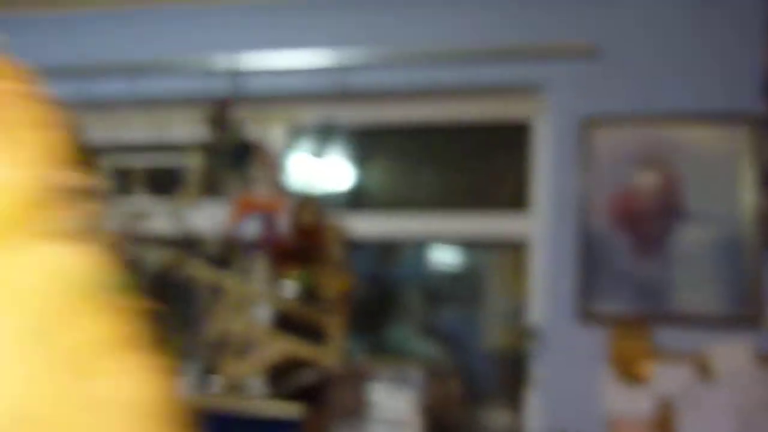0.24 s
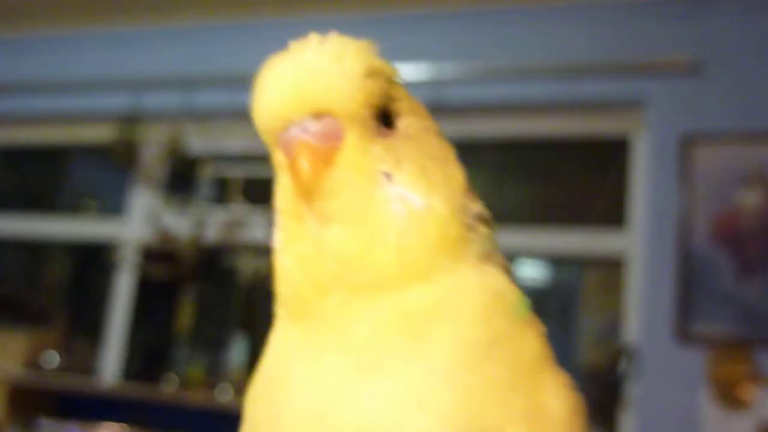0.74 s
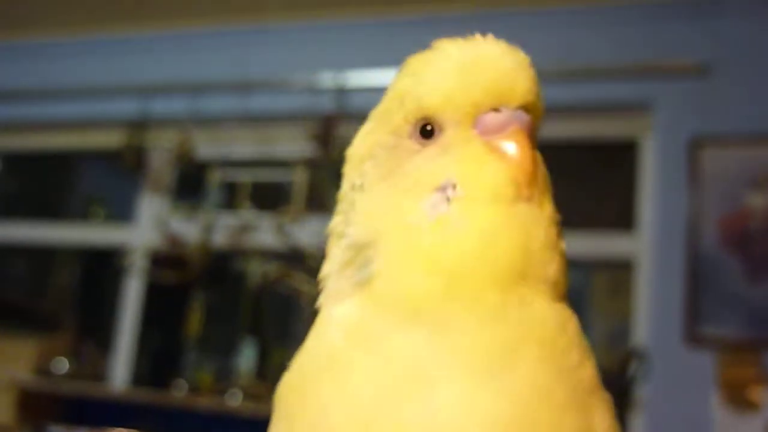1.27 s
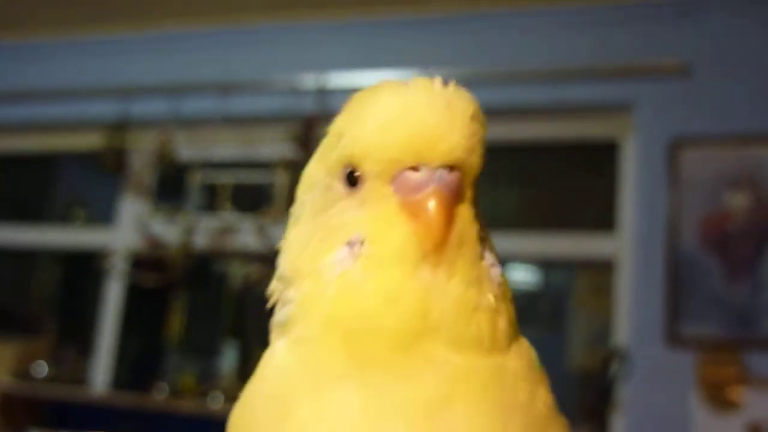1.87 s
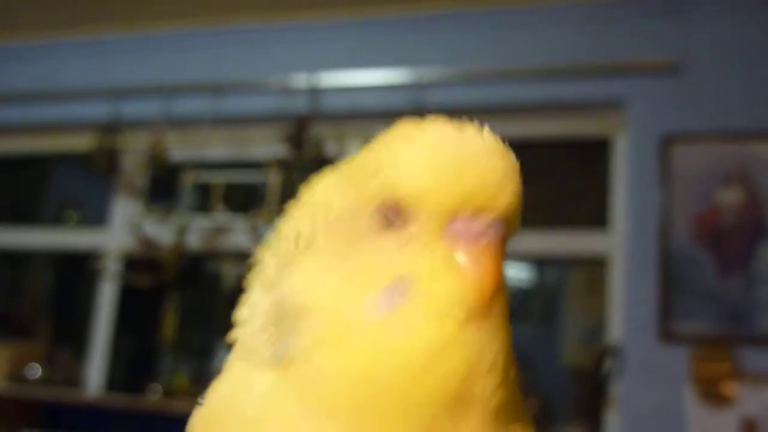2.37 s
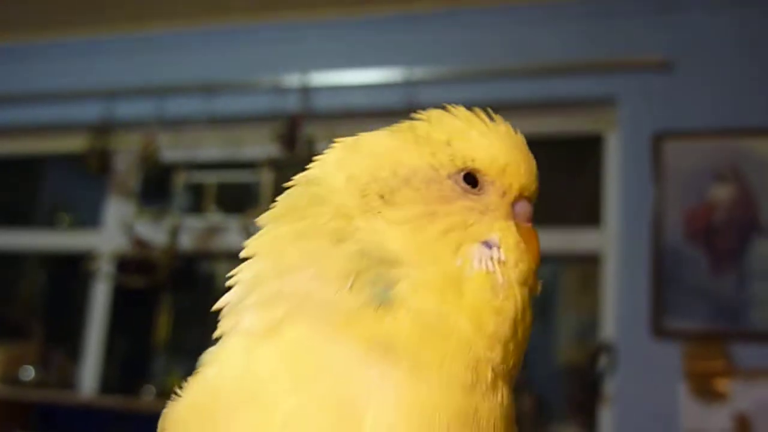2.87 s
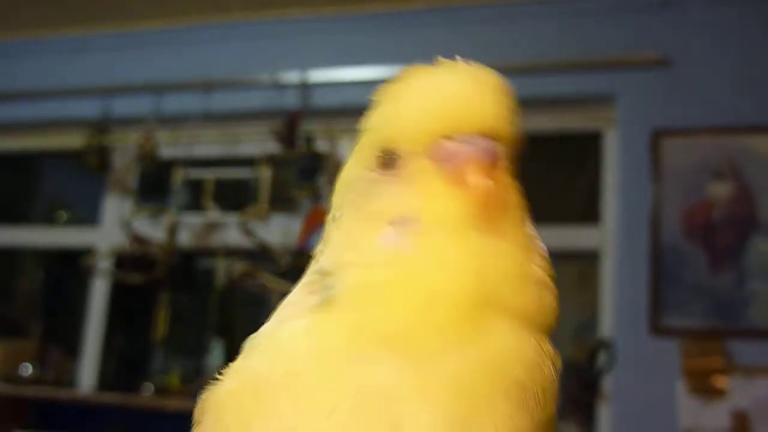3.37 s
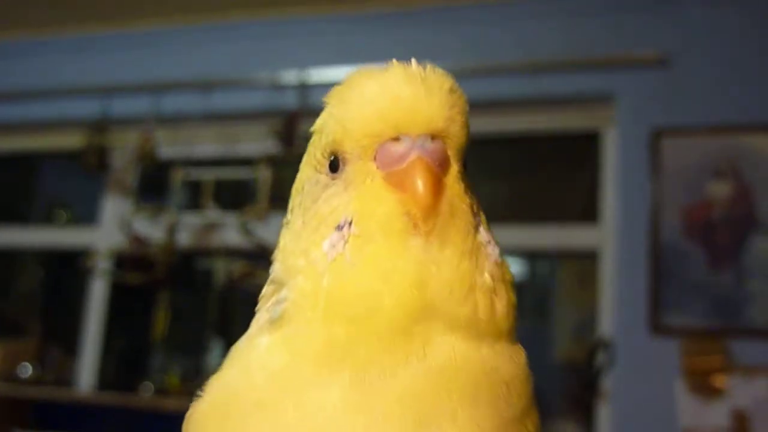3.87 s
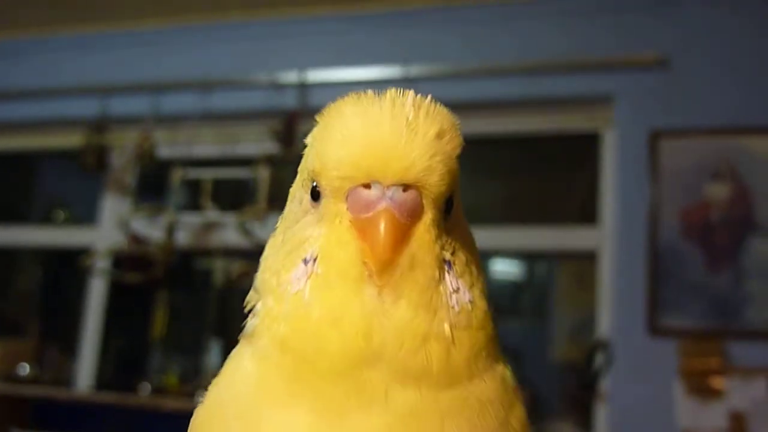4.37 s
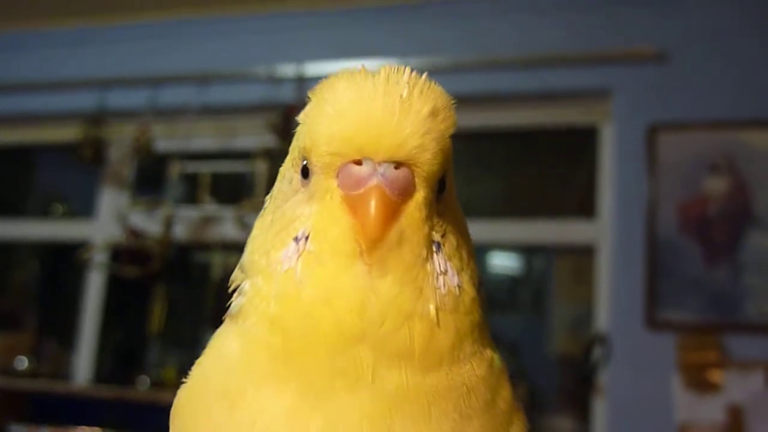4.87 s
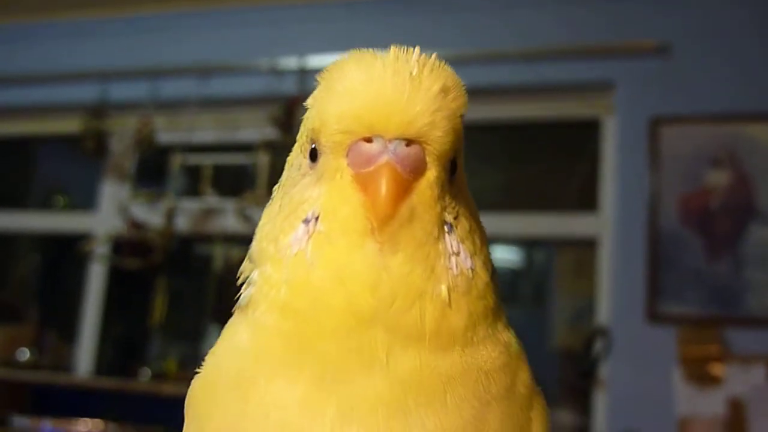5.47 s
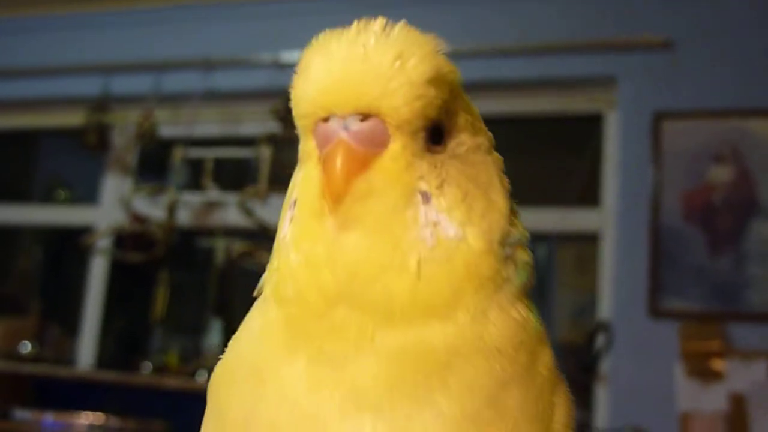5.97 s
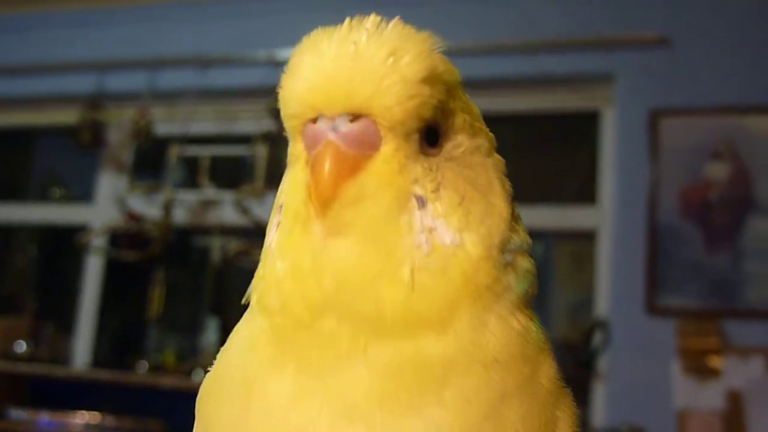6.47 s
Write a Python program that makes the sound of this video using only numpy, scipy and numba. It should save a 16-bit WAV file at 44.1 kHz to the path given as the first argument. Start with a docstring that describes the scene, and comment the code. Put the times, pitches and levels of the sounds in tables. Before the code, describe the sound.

A budgie right at the microphone makes crisp, dry beak clicks. One comes early, another after a pause, then small hollow mouth pops and a short creaking rasp. After another gap, a regular run of about eleven clicks ticks along, roughly six per second, some edged with tiny squeaks. Two more clicks finish. A faint wavering low hum and soft hiss continue in a small indoor room.

```python
"""A budgie perched right in front of a small camera clicks its beak: horn meets horn a few times within
milliseconds, each contact a minimum-phase pulse. Often the edges slip and squeak (short uneven tones), the mouth
pops (decaying sines), and once the beak creaks and grinds in a short rasp (random slips ringing resonances).
Nearby surfaces and the room answer faintly (decaying noise). An appliance hums (wavering sines) in room air
and microphone hiss (shaped noise)."""
import sys
import numpy as np
from scipy import signal
from scipy.fft import rfft, irfft
from scipy.io import wavfile
from scipy.ndimage import uniform_filter1d
from numba import njit

SR = 44100
rng = np.random.default_rng(int(sys.argv[2]) if len(sys.argv) > 2 else 0)


def persist_wave(psi):
    """Save psi, clipped to +-1, as 16-bit WAV."""
    counts = np.round(np.clip(psi, -1, 1) * 32767).astype(np.int16)
    wavfile.write(sys.argv[1], SR, np.atleast_2d(counts).T)


N = 296793

# beak clicks: [t/s of the hardest catch, knock level/dB before contact gain, snap near 2.5 kHz/dB,
#   edge near 6.5 kHz/dB, catch gap before/ms, catch gap after/ms, first touch/dB re knock, pitch factor]
CLICK_ROWS = [(0.415, -52, -2, -1, 1.2, 1.2, -30, 1), (0.546, -56, 4, -11, 1.2, 1.2, -30, 1),
              (0.7055, -24.1, 1.9, 2.5, 1.01, 1.37, -28, 1.1),
              (2.1082, -25.6, -4.7, 1, .96, 1.45, -30, .85), (2.7724, -40, 0, -18, 1, 1, -30, 1),
              (2.8827, -21.7, 4.9, -13, 1.48, 1.05, -30, 1.08), (2.8903, -31, 4, -20, .9, .8, -30, 1),
              (3.8703, -26.1, -7.7, 0, 1.57, 1.42, -30, .92),
              (4.0602, -23.3, 3, -1.7, .93, 1.17, -17, 1.16),
              (4.2179, -25.6, -4.3, -14, 1.43, 1.2, -28, .94),
              (4.3777, -23.2, -4.8, -11.1, 1.09, .86, -30, .97),
              (4.5312, -22.6, 1.5, -3.9, .82, 1.07, -30, .95), (4.7021, -25.1, 4.5, 2.3, 1.3, .82, -6, .94),
              (4.8656, -25.1, 4.4, -2.5, 1.29, .92, -5, .89),
              (5.0333, -24.3, .2, -4.5, 1.11, 1.04, -15, .89),
              (5.2051, -26.1, 1.4, -6.4, .92, 1.04, -6, .93), (5.3766, -24.1, 4.7, -1, 1.27, 1.34, -3, 1),
              (5.5496, -27, 4.2, -2.7, 1.15, 1.41, 1, .95), (5.7264, -23.7, 5.3, 3.7, 1.55, 1.57, -28, .6),
              (6.4151, -27.3, -8.8, -2, 1.53, 1.35, -30, .91),
              (6.5989, -25.3, -8, -11, 1.3, 1.09, -27, 1.15)]
# hollow of the mouth behind the beak
MOUTH_HZ, MOUTH_WIDTH_HZ = 900, 220


def undb(db):
    """Decibels to gain."""
    return 10 ** (np.asarray(db) / 20)


def unit(x):
    """Scale to an rms of one."""
    return x / np.sqrt(np.mean(x ** 2))


def shape_db(points, f):
    """Read (f/Hz, level/dB) points on a log-frequency axis."""
    hz, db = np.transpose(points)
    return np.interp(np.log(f + 1), np.log(hz), db)


def colour(x, points):
    """Filter by (f/Hz, level/dB) points, zero phase."""
    gain = undb(shape_db(points, np.fft.rfftfreq(N, 1 / SR)))
    return irfft(rfft(x) * gain, N)


def follow(rows):
    """Join (t/s, value, ..) rows by straight lines, one curve per value column."""
    s, *columns = np.transpose(rows)
    t = np.arange(N) / SR
    return np.squeeze([np.interp(t, s, c) for c in columns])


def walk(rate_hz):
    """Smooth random drift with a spread near one."""
    k = int(SR / rate_hz)
    steps = np.repeat(rng.standard_normal(N // k + 1), k)
    smooth = uniform_filter1d(uniform_filter1d(steps, k), k)
    return unit(smooth)[:N]


@njit
def sweep(x, hz, width_hz):
    """State-variable bandpass whose centre moves from sample to sample, gain one at the centre."""
    y, band, low = np.empty(len(x)), 0., 0.
    for i in range(len(x)):
        g, k = np.tan(np.pi * hz[i] / SR), width_hz / hz[i]
        v = (band + g * (x[i] - low)) / (1 + g * (g + k))
        band = 2 * v - band
        low = low + 2 * g * v
        y[i] = k * v
    return y


def resonate(x, hz, width_hz):
    """One resonance, fixed or moving, with gain one at its centre."""
    return sweep(x + 1e-18, hz * np.ones(N), float(width_hz))  # offset avoids denormals


def add(out, s, sound):
    """Mix a short sound in at time s."""
    i = int(s * SR)
    out[i:i + len(sound)] += sound[:N - i]


def impulse(db):
    """Minimum-phase pulse with this spectrum, by folding the cepstrum."""
    cepstrum = irfft(np.log(undb(db)))
    half = len(cepstrum) // 2
    folded = np.r_[cepstrum[0], 2 * cepstrum[1:half], np.zeros(half)]
    return irfft(np.exp(rfft(folded)))


def appliance(fan_hz=200.6, fan_waver_db=1.0, phase_drift_rad=.2):
    """A fan tone and weaker motor lines that waver in level and phase."""
    # fan tone: [t/s, mean rms level/dB]
    fan_level = [(0.0, -53), (0.3, -48), (0.67, -52), (0.84, -47), (0.92, -53), (1.01, -48), (1.33, -52),
                 (1.74, -48), (1.8, -51), (4.33, -48), (4.35, -52), (5.27, -53), (5.38, -48), (5.42, -52),
                 (6.67, -49), (6.73, -46)]
    # motor lines: [f/Hz, mean rms level/dB, waver/dB]
    motor_lines = [(66.3, -79.5, 2), (100.3, -66.5, 2.5), (134, -73, 1.5), (273.5, -64, 2.5),
                   (372, -66.5, 1.5), (575, -76, 2.5)]
    turn = 2 * np.pi * np.arange(N) / SR
    fan_gain = undb(follow(fan_level) + fan_waver_db * walk(12))
    out = fan_gain * np.sin(fan_hz * turn + phase_drift_rad * walk(5))
    for hz, db, waver_db in motor_lines:
        out = out + undb(db + waver_db * walk(7)) * np.sin(hz * turn + walk(5))
    return np.sqrt(2) * out  # rms to peak


def air(air_db=-51.5, hiss_db=-60.5, left_db=2.0, whine_db=-82):
    """Room air shared by both microphones, the hiss of each, and the camera's very thin whine."""
    # room air spectrum: [f/Hz, relative density/dB]
    air_shape = [(25, -25.5), (80, -24.5), (130, -20), (180, -10.5), (250, -5.5), (320, -10), (410, -8.5),
                 (520, -14), (800, -17), (1100, -23.5), (1750, -24), (1950, -33), (2750, -30), (3500, -44),
                 (8000, -56)]
    # microphone hiss spectrum: [f/Hz, relative density/dB]
    hiss_shape = [(18, -45.5), (30, -13.5), (165, -5.5), (199, -2.5), (239, -7), (477, -6.5), (560, -8),
                  (1650, -5.5), (1990, -8.5), (2620, -8), (3790, -11), (5360, -14.5), (7400, -17.5),
                  (9620, -49), (16300, -120)]
    shared = unit(colour(rng.standard_normal(N), air_shape)) * undb(air_db)
    hiss = [unit(colour(rng.standard_normal(N), hiss_shape)) * undb(hiss_db + side_db)
            for side_db in (left_db, -left_db)]
    whine = np.sin(2 * np.pi * 8000 * np.arange(N) / SR)
    return shared + np.array(hiss) + undb(whine_db) * whine


def contact(db, snap_db, edge_db, pitch=1, gain_db=25, size=1024):
    """One sharp pulse of horn on horn; snap lifts the middle treble, edge the top, pitch shifts the body."""
    # colour of one contact at pitch factor 1: [f/Hz, level/dB]
    beak_shape = [(200, -32), (450, -11.5), (700, 1.5), (900, -1.5), (1250, -2), (1750, -4.5), (2500, -1),
                  (3500, -3.5), (4600, -4.5), (6500, -6), (9000, -14)]
    f = np.fft.rfftfreq(size, 1 / SR)
    hardness = [(1200, 0.011), (2200, snap_db), (3300, snap_db),
                (5800, edge_db), (7400, edge_db), (9000, edge_db - 2.5)]
    spectrum_db = shape_db(beak_shape, f / pitch) + shape_db(hardness, f)
    return -impulse(spectrum_db) * undb(db + gain_db)


def contacts(touch_lead_s=.0047):
    """In each click the tips touch, then one edge skips over the other's ridges in a quick run of catches."""
    # catches, alike in every click: [place/gaps from the hardest, level/dB re knock, extra snap/dB]
    catches = [(-1, -5, 3), (0, 0, 0), (1, -4.5, 0), (2.3, -15, 0)]
    out = np.zeros(N)
    for s, db, snap_db, edge_db, before_ms, after_ms, touch_db, pitch in CLICK_ROWS:
        add(out, s - touch_lead_s, contact(db + touch_db, snap_db, edge_db, pitch))
        for place, catch_db, extra_db in catches:
            gap_s = (before_ms if place < 0 else after_ms) / 1000
            add(out, s + place * gap_s, contact(db + catch_db, snap_db + extra_db, edge_db, pitch))
    return out


def burr(clicks, db=-5, t60_s=.007, attack_s=.00037, low_hz=3600):
    """The horn buzzes in the treble for a few milliseconds after each contact: treble through decaying noise."""
    t = np.arange(SR // 100) / SR
    envelope = undb(-60 * t / t60_s) * (1 - np.exp(-t / attack_s))
    buzz = unit(rng.standard_normal(len(t)) * envelope) / np.sqrt(len(t))  # unit energy
    treble = signal.sosfilt(signal.butter(4, low_hz, "high", fs=SR, output="sos"), clicks)
    return undb(db) * signal.fftconvolve(treble, buzz)[:N]


def mouth(clicks, db=-3):
    """Contacts ring the mouth cavity, whose pitch glides from click to click as the mouth opens or closes."""
    hz = MOUTH_HZ * follow([(s, pitch) for s, *_, pitch in CLICK_ROWS])
    return undb(db) * resonate(clicks, hz, MOUTH_WIDTH_HZ)


def squeaks(wobble=.04, rough=.45):
    """Stick and slip makes some 10-30 uneven cycles of a high tone and stirs the horn's other resonances."""
    # slips: [start t/s, length/s, f/Hz, nominal peak level/dB]
    slip_rows = [(0.7048, 0.0034, 6080, -20.5), (2.107, .0023, 5045, -26), (2.8906, 0.0037, 3330, -29),
                 (3.8684, .0048, 6076, -28.5), (4.0551, 0.0044, 3830, -21), (4.0608, 0.003, 4330, -22.5),
                 (4.216, .0035, 4020, -24), (4.3764, .0035, 3950, -19.5), (4.5301, .003, 4130, -19),
                 (4.698, 0.0033, 3870, -30), (6.4127, 0.0045, 4730, -23.5), (6.5982, 0.003, 4680, -19)]
    # horn resonances: [f/Hz, level/dB re squeak]
    horn_modes = [(3850, -15), (4750, -14), (6300, -18)]
    out, drift, grip = np.zeros(N), walk(3000), walk(3000)
    for s, length_s, hz, db in slip_rows:
        n, i = int(length_s * SR), int(s * SR)
        swell, uneven = signal.windows.tukey(n, .7), drift[i:i + n]
        uneven = uneven - np.average(uneven, weights=swell ** 2)  # keeps the mean pitch
        turn = 2 * np.pi * np.cumsum(1 + wobble * uneven) / SR
        modes = sum(undb(mode_db) * np.cos(mode_hz * turn) for mode_hz, mode_db in horn_modes)
        tone = np.sin(hz * turn) + modes
        roughness = unit(1 + rough * grip[i:i + n])
        add(out, s, undb(db) * swell * roughness * tone)
    return out


def pops(attack_s=0.001):
    """The mouth cavity rings briefly as the tongue lets go: decaying sines."""
    # small hollow pops: [t/s, f/Hz, level/dB before attack and decay, t60/s]
    pop_rows = [(2.4663, 920, -33, 0.029), (2.6503, 2940, -28.5, 0.0088), (2.7535, 967, -21, 0.031),
                (2.7759, 1233, -30, 0.051)]
    out, t = np.zeros(N), np.arange(SR // 10) / SR
    for s, hz, db, t60_s in pop_rows:
        envelope = undb(db - 60 * t / t60_s) * (1 - np.exp(-t / attack_s))
        add(out, s, envelope * np.sin(2 * np.pi * hz * t))
    return out


def rasp(slips_per_s=3500, mouth_db=-3):
    """Dense tiny slips ring the beak, its resonances shifting as the contact slides; the mouth rings along."""
    # grinding: [t/s, level/dB, pitch factor of the resonances]
    grind_rows = [(2.69, -60, 0.76), (2.70, -50, .6), (2.706, -33.5, 0.53), (2.722, -42, .72),
                  (2.735, -31.5, 1.1), (2.749, -31, 1.03), (2.754, -28.5, 0.93), (2.761, -33, .9),
                  (2.768, -54, .9), (2.785, -60, 0.62)]
    # beak resonances: [f/Hz at pitch factor 1, width/Hz, level/dB before colouring]
    grind_modes = [(2320, 450, 3), (2960, 620, 8), (3600, 660, 7), (4500, 450, -14), (6600, 1500, -16)]
    db, pitch = follow(grind_rows)
    struck = rng.random(N) < slips_per_s / SR
    slips = struck * rng.uniform(.3, 1, N) * rng.choice([-1, 1], N)
    ring = sum(undb(mode_db) * resonate(slips, hz * pitch, width_hz) for hz, width_hz, mode_db in grind_modes)
    ring = ring + undb(mouth_db) * resonate(slips, MOUTH_HZ, MOUTH_WIDTH_HZ)
    ring = colour(ring, [(200, -21), (750, 6.5), (4100, -2), (5200, -6), (8000, -8.5)])
    t = np.arange(N) / SR
    active = (t > grind_rows[0][0]) * (t < grind_rows[-1][0])
    return unit(ring) * undb(db) * active


def creak(count=5, start_s=2.6978, gap_s=.00385, uneven=.07):
    """Pressed hard, the beak catches slowly on differing spots: even catches swell, fade and grow brighter."""
    level_db, arch_db = -23.5, 5  # level before contact gain
    snap_db, first_edge_db, brighten_db_per_s = -2, -29, 800
    out, pitch = np.zeros(N), np.exp(uneven * rng.standard_normal(count))
    for k, arch in enumerate(np.linspace(-1, 1, count) ** 2):
        age_s = k * gap_s
        edge_db = first_edge_db + brighten_db_per_s * age_s
        add(out, start_s + age_s, contact(level_db - arch_db * arch, snap_db, edge_db, pitch[k]))
    return out


def room(x, gap_s=0.0025, spread=0.59):
    """Quick scatter from the camera and perch, then a faint room tail, nearly alike in both ears."""
    t = np.arange(SR // 2) / SR
    tail = 0
    for db, t60_s in ((-11.5, .046), (-20.0, .24)):  # early, late
        noise = rng.standard_normal(len(t)) + spread * rng.standard_normal((2, len(t)))
        scatter = noise * undb(-60 * t / t60_s) * (t > gap_s)
        tail = tail + undb(db) * unit(scatter) / np.sqrt(len(t))
    return x + signal.fftconvolve(x[None], tail, axes=1)[:, :N]


def aim(near):
    """The beak is so close that its treble favours the microphone it points at."""
    # near sounds fully aimed: [f/Hz, left minus right/dB]
    pan_shape = [(500, -2.5), (2600, 1.5), (3400, 1), (4000, 5), (4800, 6.5), (6000, 8), (8000, 3)]
    # pointing at the left microphone: [t/s, share of the full pan]
    facing = [(.7, 1), (2.1, .8), (2.6, 0.04), (2.9, 0.2), (3.85, 1), (4.4, 1), (5.7, 1), (6.4, 1.17)]
    aimed = np.array([colour(ear, [(hz, sign * db / 2) for hz, db in pan_shape])
                      for ear, sign in zip(near, (1, -1))])
    return near + follow(facing) * (aimed - near)


def scene():
    """Beak and mouth sounds get the room's answer and are aimed; appliance and air lie beneath."""
    clicks = contacts() + creak()
    clicks = clicks + burr(clicks) + mouth(clicks)
    near = room(clicks + squeaks() + pops() + rasp())
    return aim(near) + appliance() + air()


def record(dry, notch_hz=5430, top_hz=8800):
    """The camera has a narrow notch in the treble and rolls off early."""
    notched = signal.lfilter(*signal.iirnotch(notch_hz, 16, fs=SR), dry)
    dull = colour(notched, [(7400, 0), (7800, -13), (8600, -18)])
    return signal.sosfilt(signal.ellip(8, .2, 70, top_hz, fs=SR, output="sos"), dull)


dry = scene()
out = record(dry)
persist_wave(out)
```